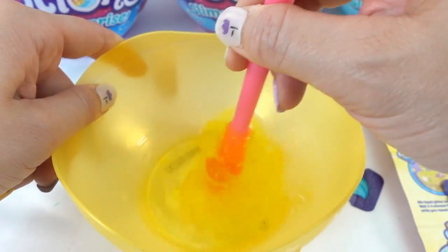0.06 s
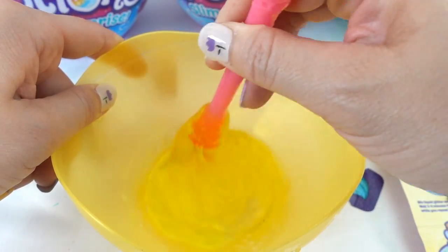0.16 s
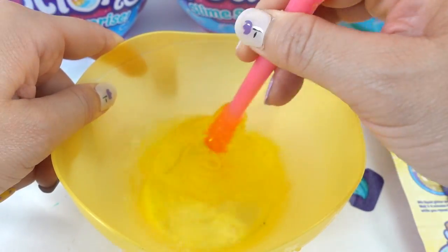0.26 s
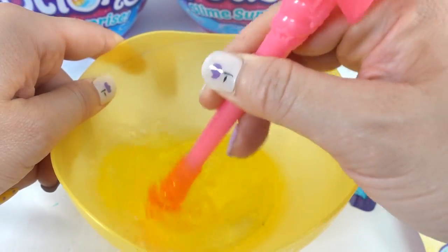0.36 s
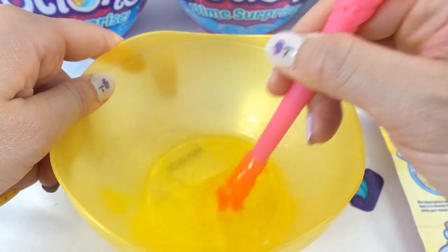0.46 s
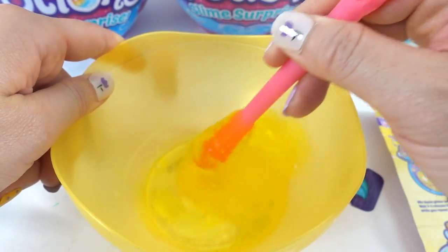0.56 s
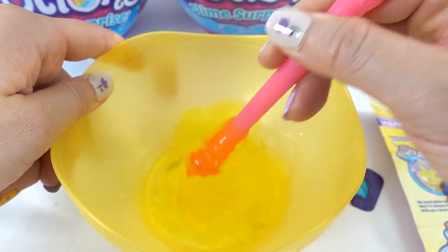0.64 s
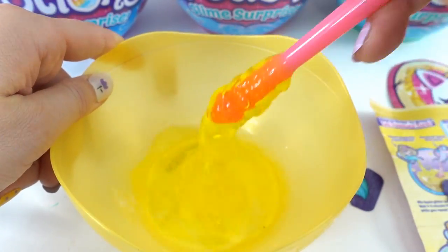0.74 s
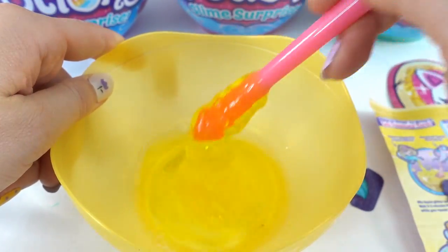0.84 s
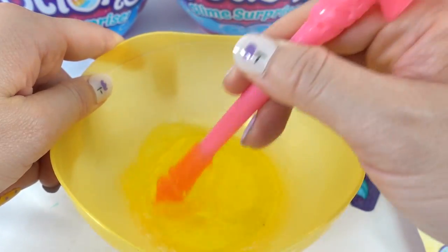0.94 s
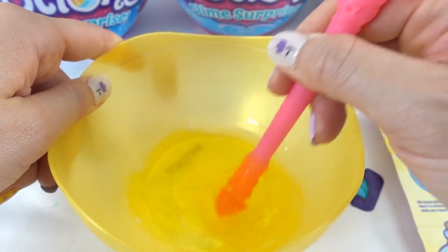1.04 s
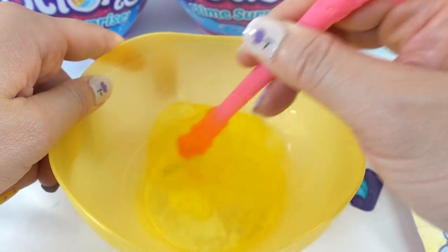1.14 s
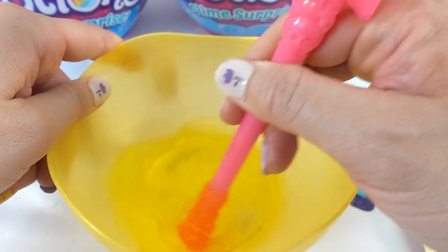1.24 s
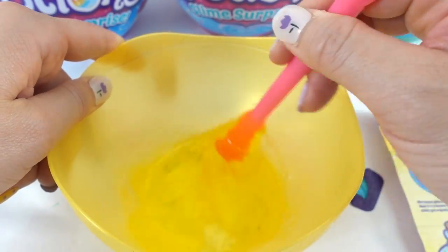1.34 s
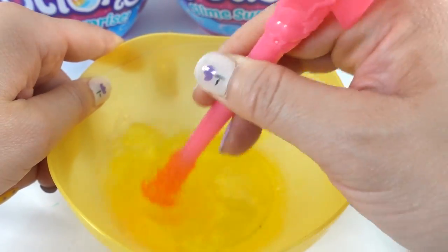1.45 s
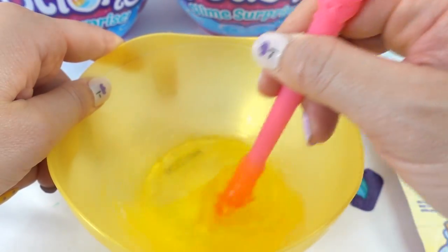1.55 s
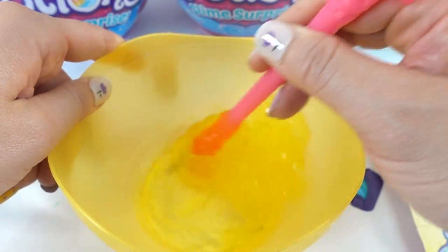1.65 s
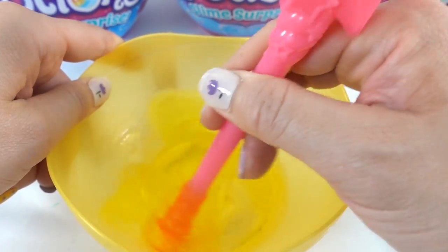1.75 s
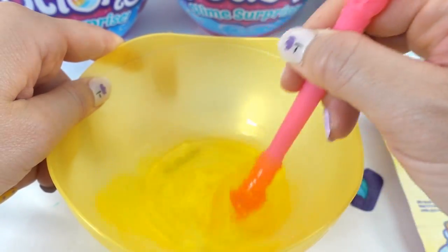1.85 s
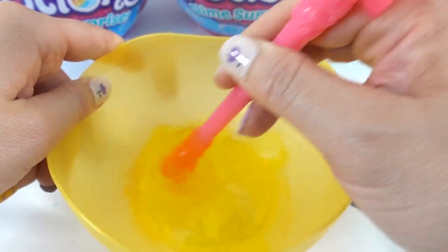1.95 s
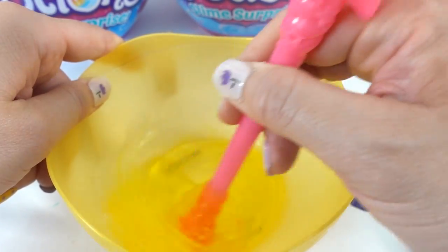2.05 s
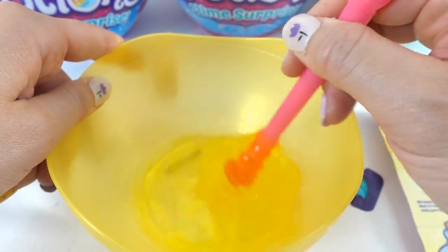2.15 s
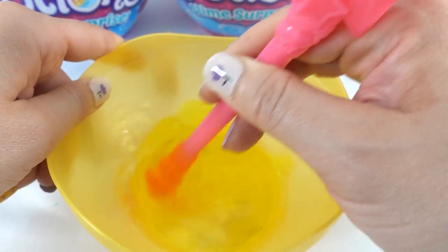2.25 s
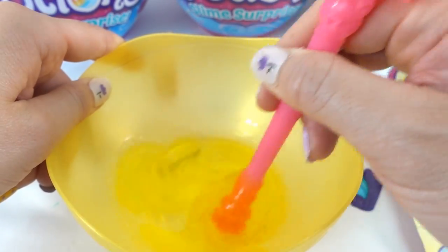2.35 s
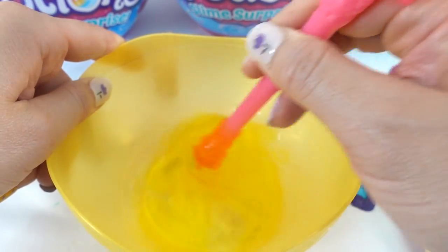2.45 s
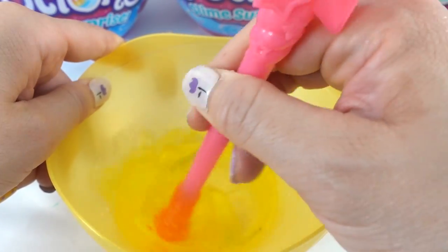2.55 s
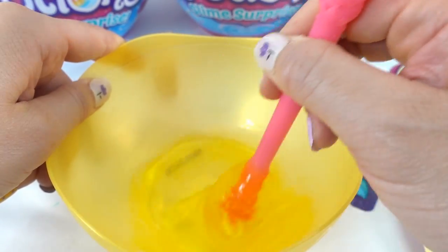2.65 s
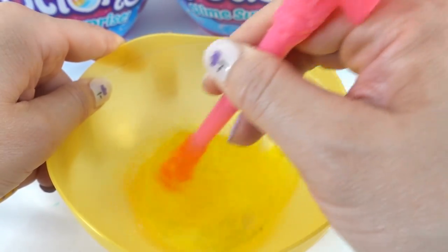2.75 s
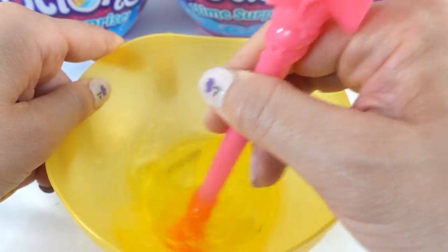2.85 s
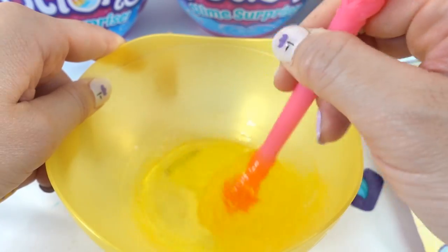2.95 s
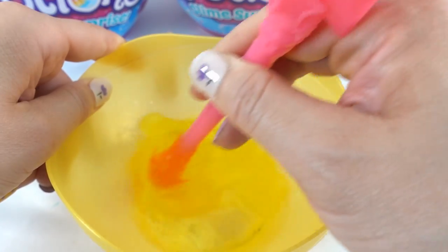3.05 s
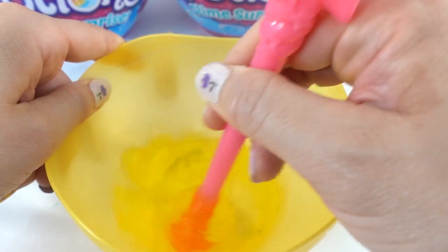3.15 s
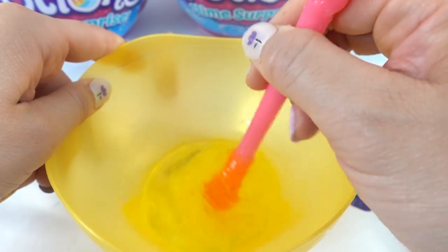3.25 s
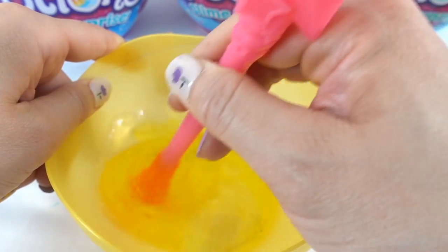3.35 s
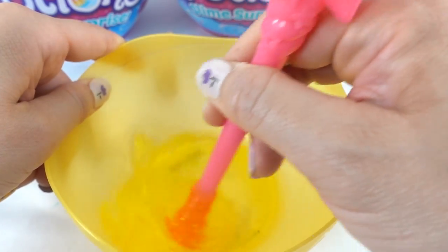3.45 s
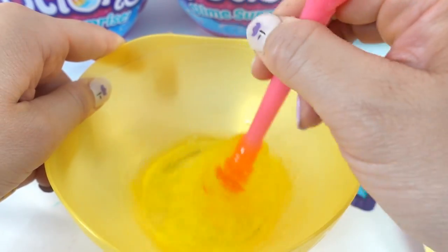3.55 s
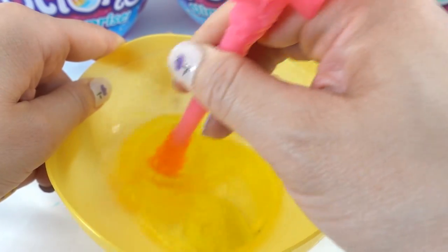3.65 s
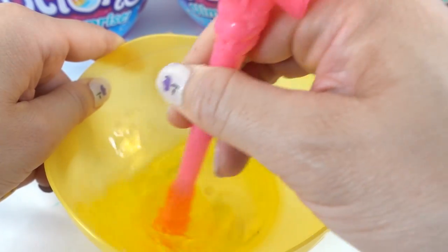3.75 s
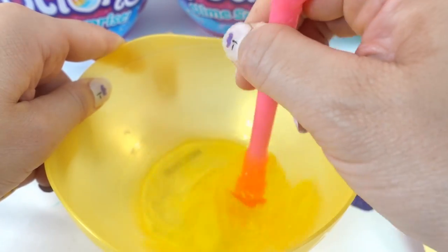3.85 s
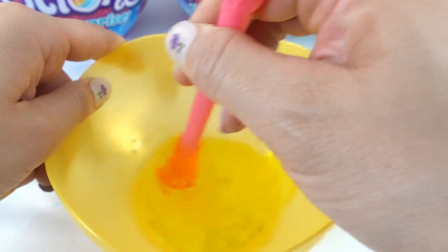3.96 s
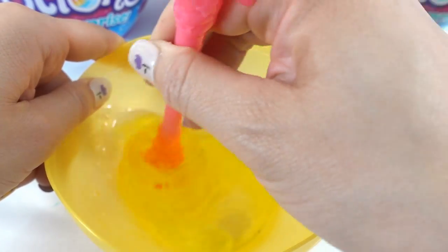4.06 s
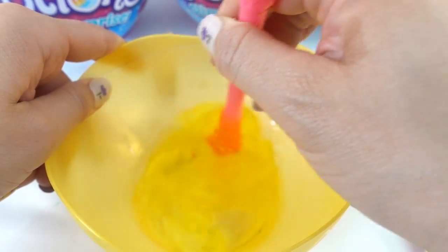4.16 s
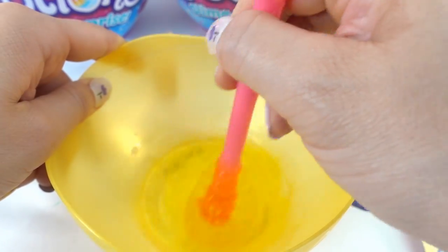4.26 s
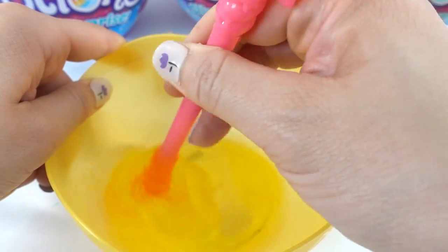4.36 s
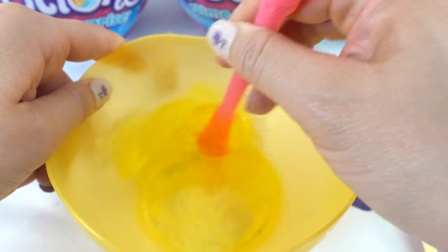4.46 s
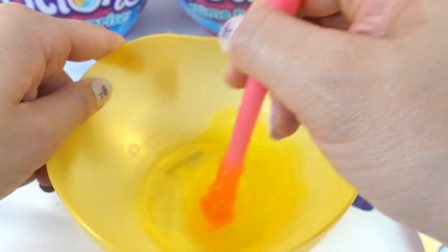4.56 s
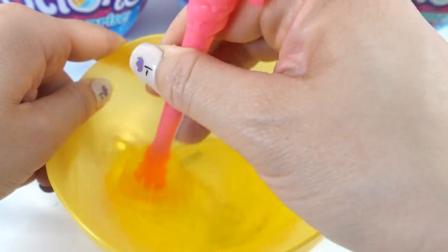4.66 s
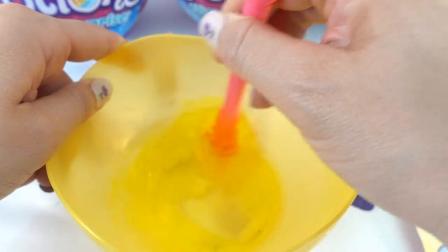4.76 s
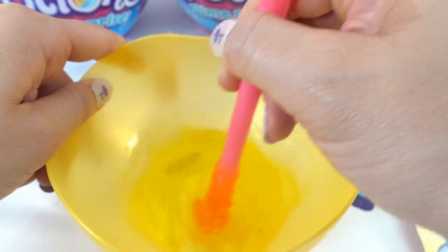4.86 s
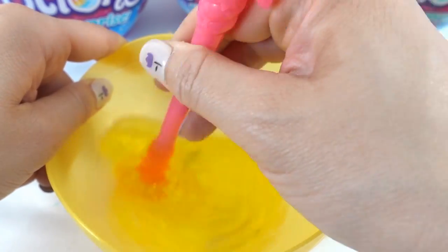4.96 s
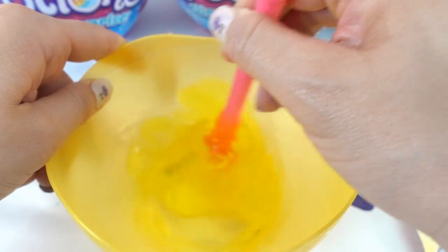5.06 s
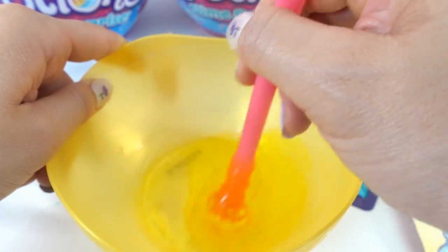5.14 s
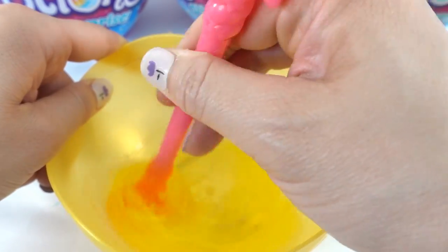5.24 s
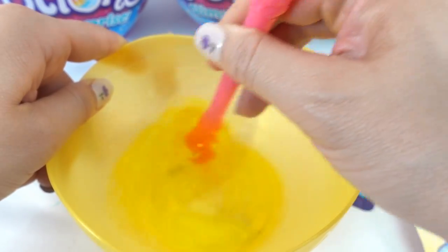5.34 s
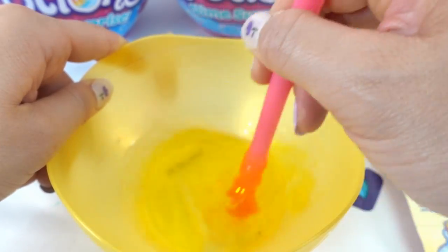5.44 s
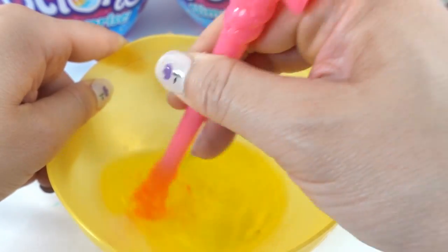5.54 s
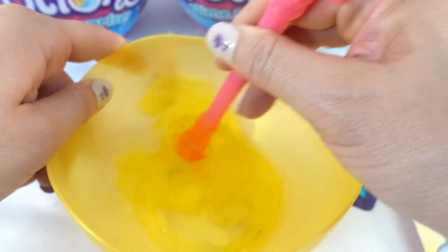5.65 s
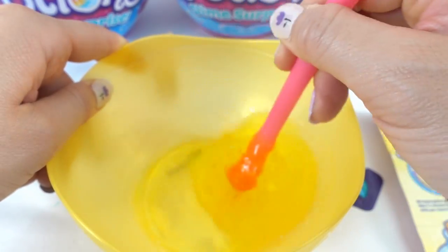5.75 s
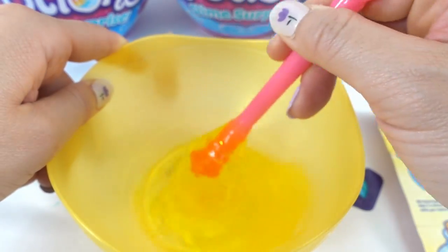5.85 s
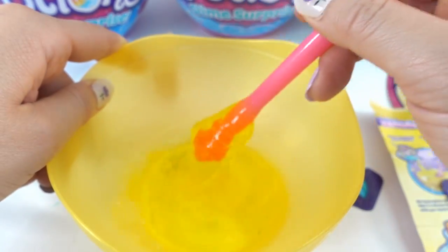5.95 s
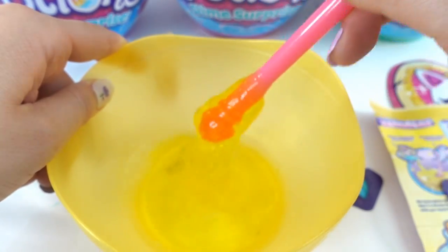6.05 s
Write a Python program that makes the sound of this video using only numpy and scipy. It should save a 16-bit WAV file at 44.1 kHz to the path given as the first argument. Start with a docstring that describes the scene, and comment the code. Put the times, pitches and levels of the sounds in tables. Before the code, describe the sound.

Up close in a quiet room, a plastic stick rubs softly through slime in a plastic bowl and pauses for half a second. It then settles into steady stirring, about three or four sticky scrapes a second. Two bubbles snap sharply early on, and the stick bumps the bowl now and then, hardest around the middle. The stirring ends with a couple of tiny clicks over faint hiss.

```python
"""A plastic wand stirs thick slime in a hand-held plastic bowl, close to a stereo microphone in a quiet room.
The tip scrapes the wall in a few soft strokes, then rests for half a second while the slime pops.
From 1 s on it stirs stroke after stroke, squelching, slipping in short bursts and knocking the bowl.
Two sharp bubbles snap near 1.5 s and the hardest knock lands at 3.3 s.
The stirring stops just before 6 s, leaving two small ticks over the room tone."""
import sys
import numpy as np
from scipy import signal
from scipy.fft import rfft, irfft
from scipy.io import wavfile
from scipy.ndimage import uniform_filter1d

SR = 44100
rng = np.random.default_rng(int(sys.argv[2]) if len(sys.argv) > 2 else 0)


def transcribe(signal):
    """Save signal, clipped to [-1, 1], as a 16-bit WAV file at the path in sys.argv[1]."""
    frames = np.atleast_2d(signal).T
    limited = np.clip(frames, -1, 1)
    pcm = np.round(limited * 32767).astype(np.int16)
    wavfile.write(sys.argv[1], SR, pcm)


N = 269098

# stereo width of the bowl, centred in the bass and wide on top: pitch_hz, side_db
BOWL_WIDTH = [(100, -57), (500, -21.5), (1500, -12), (4000, -10), (9000, -1), (14000, -2)]


def scrape():
    """The touching tip drives the floor, wall and treble resonances of the bowl and squeezes the slime."""
    # resonances of bowl and wand, damped by slime: pitch_hz, base_width_hz, level_db
    floor_modes = [(117, 50, -21), (278, 46, -11.5), (577, 257, -12.5), (903, 153, -7.5), (1044, 72, 0),
                   (1266, 274, -6)]
    wall_modes = [(1580, 79, 4), (1856, 95, 3), (2071, 116, 0.5), (2390, 260, -2), (2834, 364, -6.5),
                  (3256, 147, -1), (3696, 410, -3), (3895, 310, -6.5), (4230, 215, -4.5), (4637, 59, 1.5),
                  (5095, 500, -4.5)]
    treble_modes = [(5950, 260, 18.5), (6740, 130, 5.5), (7070, 790, 14.5), (7960, 850, 9.5),
                    (9040, 3900, 0), (11400, 1500, 2), (13700, 1200, -1), (16400, 4600, -3)]
    touching, level_db, floor_db, treble_db, pitch_hz = strokes()
    # the tip lands and lets go within a few ms; the slime clings longer
    land, grip, cling, wake = np.exp(-1 / (np.array([.003, .0025, .03, .004]) * SR))
    edges = [signal.lfilter([1 - r], [1, -r], touching, zi=[r])[0] for r in (land, grip)]
    contact = np.maximum(*edges) + 0.43 * signal.lfilter([1 - cling], [1, -cling], touching)
    rub = friction(per_s=4500, spread_db=2) * from_db(0.62 * drift(23) + 0.55 * drift(84))
    floor = from_db(floor_db) * rubbed_bowl(rub, floor_modes, low_cut_hz=31, wander_db=5, wander_hz=12.5)
    wall = rubbed_bowl(rub, wall_modes, low_cut_hz=820, wander_db=5.5, wander_hz=12.8,
                       focus_hz=pitch_hz, focus_db_per_octave=12)
    # the treble builds up as the tip gathers speed
    speed = signal.lfilter([1 - wake], [1, -wake], np.minimum(contact, 1) * from_db(treble_db))
    treble = speed * rubbed_bowl(rub, treble_modes, low_cut_hz=6900, wander_db=5, wander_hz=10.8)
    return contact * from_db(level_db) * (floor + wall + treble + from_db(-11.5) * squelches())


def strokes():
    """Control curves for the scrape: each stroke is one arc up the wall and back."""
    # strokes of the tip: start_s, end_s, start_db, end_db, floor_db, treble_db, pitch_hz, fastest_fraction
    stroke_table = [(0.0, 0.1, -48.5, -47, 1.5, -16, 2360, 1),
                    (0.113, 0.169, -42.5, -45, 6, -20, 2200, 0.6),
                    (0.186, 0.235, -43, -50.5, 3, -32, 2220, 0),
                    (0.293, 0.314, -50.5, -54.5, 3, -26, 2130, 0.7),
                    (0.333, 0.529, -54, -42.5, 1, -16.5, 2460, 0.94),
                    (1.072, 1.108, -37, -50, -4, -21, 2640, 0.1),
                    (1.219, 1.237, -48, -47.5, 2.5, -14, 2600, 0.5),
                    (1.24, 1.365, -45.5, -41, -0.5, -15.5, 2520, 0.93),
                    (1.447, 1.64, -39, -40, -6, -13.5, 2800, 0.57),
                    (1.691, 1.85, -37.5, -42, -3.5, -16, 2840, 0.5),
                    (1.844, 1.945, -38.5, -38.5, -9.5, -10, 3240, 0.1),
                    (1.948, 2.208, -46, -37.5, -2, -15.5, 2780, 0.9),
                    (2.228, 2.482, -42, -39, -3.5, -16.5, 2840, 0.6),
                    (2.527, 2.757, -43, -38.5, -4, -17.5, 2500, 1),
                    (2.775, 2.81, -50, -64, 1, -30, 1690, 0.6),
                    (2.853, 3.049, -43.5, -38.5, -4, -17, 2640, 1),
                    (3.091, 3.356, -39.5, -43, -2, -16.5, 2600, 0.07),
                    (3.329, 3.402, -31, -51.5, 3, -42, 1660, 0.4),
                    (3.413, 3.617, -45.5, -39, -1.5, -18.5, 2520, 1),
                    (3.67, 3.914, -44, -38.5, -0.5, -17.5, 2560, 1),
                    (3.907, 3.973, -48.5, -39, -4, -25, 2400, 0.9),
                    (3.986, 4.075, -37, -69, 9, -41, 1540, 0.5),
                    (4.134, 4.282, -49.5, -43.5, 1.5, -21, 2180, 0.8),
                    (4.339, 4.42, -34.5, -39, -2, -18, 2620, 0.1),
                    (4.425, 4.564, -42, -40.5, 0, -18, 2410, 0.6),
                    (4.628, 4.867, -35, -43, -2, -15, 2670, 0.48),
                    (4.892, 5.08, -37.5, -35, -5, -14.5, 2730, 1),
                    (5.07, 5.146, -42.5, -38.5, -2, -14.5, 3220, 0),
                    (5.183, 5.441, -38, -40.5, -2, -14, 2720, 0.9),
                    (5.492, 5.509, -46, -42, 7, -11, 2860, .5),
                    (5.512, 5.653, -36, -41.5, -0.5, -14.5, 2800, 0.5),
                    (5.655, 5.765, -41.5, -43, -4.5, -15.5, 2500, 0)]
    t, rows = np.arange(N) / SR, np.array(stroke_table)
    current = np.maximum(np.searchsorted(rows[:, 0], t, "right") - 1, 0)
    start_s, end_s, start_db, end_db, floor_db, treble_db, pitch_hz, fastest = rows[current].T
    progress = np.clip((t - start_s) / (end_s - start_s), 0, 1)
    fastest = np.clip(fastest, .05, .95)
    arc = np.sin(np.pi / 2 * np.minimum(progress / fastest, (1 - progress) / (1 - fastest)))
    touching = (t <= end_s) * 1.
    level_db = start_db + (end_db - start_db) * progress
    # at its fastest the tip is highest on the wall: a touch softer, less floor, brighter, higher
    return touching, level_db - arc, floor_db - 3 * arc, treble_db + 4 * arc, pitch_hz * (1 + 0.068 * arc)


def friction(per_s, spread_db):
    """Stick-slip of the tip on the rough wall: dense uneven clicks, a mid and a side stream."""
    sizes = from_db(spread_db * np.minimum(rng.exponential(1, (2, N)), 5)) * rng.choice([-1, 1], (2, N))
    return rms_one(sizes * (rng.random((2, N)) < per_s / SR) + 1e-9)


def rubbed_bowl(rub, modes, low_cut_hz, wander_db, wander_hz, focus_hz=1, focus_db_per_octave=0):
    """Friction through resonances; the moving tip wakes now one, now another. Level evened to 1."""
    out, signs = 0, rng.choice([-1., 1.], N)     # every click pushes each mode its own way
    for k, (hz, base_width_hz, level_db) in enumerate(modes):
        octaves_away = np.abs(np.log2(hz / focus_hz))
        drive = from_db(level_db + wander_db * drift(wander_hz) - focus_db_per_octave * octaves_away)
        band = (hz, 1.6 * base_width_hz)
        mid, side = resonate(rub * np.roll(signs, k) * drive, band, band)     # twice, for dark valleys
        out = out + stereo(mid, side, at_hz(BOWL_WIDTH, hz))
    out = high_pass(out, low_cut_hz)
    return out / np.sqrt(uniform_filter1d(out.mean(axis=0) ** 2, size=2000, mode="reflect") + 1e-12)


def slips():
    """The tip slips and catches again: a fast rough rub that swells and stops around one pitch."""
    # slips of the tip: peak_s, level_db, pitch_hz, swell_s, fall_s, treble_db
    slip_table = [(0.085, -37, 2440, 0.0082, 0.0044, -17), (0.392, -34, 3440, 0.014, 0.0053, -20),
                  (0.414, -37, 1980, 0.0047, 0.0038, -30), (0.506, -33, 2440, 0.02, 0.0088, -24),
                  (1.254, -38.5, 2490, 0.0077, 0.012, -7), (1.345, -34, 2420, 0.022, 0.011, -11),
                  (1.493, -35.5, 3500, 0.0039, 0.0064, -6.5), (1.599, -37, 2600, 0.011, 0.014, -12),
                  (1.629, -41, 2290, 0.0037, 0.002, -1), (1.762, -37, 1560, 0.0088, 0.025, -6),
                  (1.932, -23.5, 3640, 0.0069, 0.0076, -13), (2.033, -29.5, 3300, 0.0054, 0.016, -40),
                  (2.09, -31, 1500, 0.0016, 0.0028, -30), (2.132, -37, 2350, 0.0037, 0.007, -10),
                  (2.249, -36, 1120, 0.0027, 0.031, -32), (2.309, -37, 2120, 0.0069, 0.012, -5.5),
                  (2.332, -32.5, 1375, 0.0059, 0.011, -16), (2.476, -29, 2300, 0.013, 0.0019, -15),
                  (2.536, -37, 1090, 0.0022, 0.016, -39), (2.569, -35, 3180, 0.0026, 0.03, -14.5),
                  (2.751, -33.5, 3440, 0.0039, 0.0026, -6.5), (2.837, -49, 3400, 0.0032, 0.0045, -28),
                  (3.037, -26.5, 4360, 0.0045, 0.0056, -14.5), (3.414, -35.5, 3250, 0.0043, 0.01, -37),
                  (3.471, -38, 867, 0.009, 0.0038, -78), (3.622, -33, 2460, 0.0095, 0.0041, -35),
                  (4.172, -36.5, 1065, 0.0042, 0.021, -58), (4.212, -37, 1100, 0.013, 0.0065, -39),
                  (4.261, -38.5, 1910, 0.0021, 0.02, -11), (4.434, -30, 3140, 0.0035, .008, -12),
                  (4.441, -23.5, 3250, 0.0063, 0.0081, -45), (4.543, -33, 2090, 0.006, 0.0052, -13),
                  (4.701, -28.5, 3370, 0.0091, 0.013, -12.5), (4.861, -36.5, 1120, 0.029, 0.004, -11),
                  (4.911, -35, 1030, 0.012, 0.024, -28), (5.306, -31, 3410, 0.031, 0.038, -11),
                  (5.336, -26, 3200, 0.008, 0.0022, -27), (5.607, -27.5, 3100, 0.0028, 0.0057, -23),
                  (5.671, -31.5, 3890, 0.0016, 0.02, -12.5)]
    out, t = np.zeros((2, N)), np.arange(-1800, 1800) / SR
    soften = signal.butter(2, 5200, fs=SR, output="sos")
    for peak_s, level_db, pitch_hz, swell_s, fall_s, treble_db in slip_table:
        envelope = np.exp(-(t / np.where(t < 0, swell_s, fall_s)) ** 2)
        white = rng.standard_normal((2, len(t)))
        squeak = rms_one(resonate(white, (pitch_hz, 113)) + 0.23 * resonate(white, (2850, 1000)))
        fizz = rms_one(resonate(high_pass(white, 7100), (3500, 2500), (7100, 5600)))
        rub = signal.sosfilt(soften, squeak) + from_db(treble_db) * fizz
        add(out, peak_s + t[0], from_db(level_db) * stereo(*(envelope * rub), side_db=-8))
    return out


def knocks():
    """A light touch, then the blow with its crack; the place struck sets the balance of the bowl's modes."""
    # wand against the wall: blow_s, lead_s, deep_db, bass_db, low_mid_db, mid_db, upper_db
    knock_table = [(0.134, 0.0048, -47, -34.5, -33.5, -31, -34.5),
                   (1.264, 0.0071, -46, -37.5, -24.5, -22, -37),
                   (1.45, 0.0047, -40, -37.5, -34.5, -41, -48), (1.687, 0.0046, -44, -38, -36.5, -31, -36),
                   (2.4389, 0.0049, -43, -31.5, -20, -22.5, -24),
                   (2.725, 0.005, -43, -32, -19.5, -17.5, -28), (3.3286, 0.005, -32, -16.5, -13, -9, -16.5),
                   (3.9796, 0.00089, -36.5, -22, -18.5, -18, -18),
                   (4.262, 0.000876, -62, -43, -39, -22, -32), (4.416, 0.0047, -67, -37.5, -40, -24, -32),
                   (4.731, 0.014, -63, -36, -62, -45, -54), (5.514, 0.0031, -35.5, -27.5, -19, -9.5, -32)]
    # modes of the struck bowl: pitch_hz, level_db, t60_s
    bowl_modes = [(56, -6, 0.06), (83, -5, 0.057), (110, 8.5, 0.099), (159.6, -1.5, 0.15),
                  (197, -11, 0.089), (269.8, 3.5, 0.11), (326, 6.5, 0.044), (386, -7.5, 0.12),
                  (518, 7.5, 0.025), (620, -9, 0.11), (869, -7, 0.048), (1008, 1.5, 0.03),
                  (1273, -9.5, 0.066), (1240, 9, 0.036), (1545, 4.5, 0.027), (2010, -0.5, 0.013),
                  (2160, -5.5, 0.058), (2360, -6.5, 0.057), (2830, 6, 0.0059), (3310, -11, 0.03),
                  (3960, -2, 0.019), (5090, -6, 0.026)]
    crossovers_hz = [230, 430, 720, 1150]
    out, t = np.zeros((2, N)), np.arange(9000) / SR
    for blow_s, lead_s, *bands_db in knock_table:
        lead_s = np.clip(lead_s, 0, .01)     # the touch comes at most 10 ms early
        scatter, sound = rng.normal(0, 1, (len(bowl_modes), 2)), 0
        for k, ((hz, mode_db, t60_s), (jitter, pan)) in enumerate(zip(bowl_modes, scatter)):
            rise_s = 0.0026 * (300 / hz) ** 1.31     # the wall yields: low modes take longer to build up
            push = 0
            for hit_s, force in ((0, .3), (lead_s, 1)):
                age = np.maximum(t - hit_s, 0)
                push = push + force * age * np.exp(-age / rise_s) * np.sin(2 * np.pi * hz * age)
            gain = from_db(mode_db + bands_db[np.searchsorted(crossovers_hz, hz)] + 0.5 * jitter)
            tone = gain * ring(push / (rise_s ** 2 * SR), hz, t60_s) * (-1) ** k
            sound = sound + stereo(tone, pan * tone, at_hz(BOWL_WIDTH, hz))
        crack = rng.standard_normal((2, len(t))) * np.exp(-np.abs(t - lead_s) / .0006) * (t >= lead_s)
        sound += from_db(bands_db[-1] + 7.5) * stereo(*resonate(crack, (3150, 2900), (3100, 3700)), -1.2)
        # the many small modes of wall and slime blur into a wash
        wash = rng.standard_normal((2, len(t))) * from_db(-60 * t / 0.066) * (t >= lead_s)
        sound += from_db(bands_db[3] - 7) * stereo(*resonate(wash, (2100, 2500), (1500, 3300)), -15)
        add(out, blow_s - lead_s, sound)
    return out


def pops():
    """A tiny snap: a few cycles at the bubble's pitch, a weak broad tick and some body from the bowl."""
    # slime bubbles and threads snapping: start_s, level_db, pitch_hz, body_db
    pop_table = [(0.197, -33, 3500, -11), (0.329, -36, 10900, -10), (0.5721, -34, 5560, -5),
                 (0.6899, -26, 8700, -6), (0.691, -30, 3700, 9.5), (1.129, -45, 4000, 13),
                 (1.2326, -23, 6600, -16), (1.397, -10.5, 3840, -4.5), (1.406, -24, 15100, -12),
                 (1.411, -17, 5900, -28), (1.414, -23, 12000, -1), (1.6364, -25, 12000, -15),
                 (1.657, -30, 11000, -1), (1.664, -7.5, 3800, -8), (1.787, -33, 10000, 4),
                 (2.2514, -21, 4860, -20), (3.644, -30.5, 12700, 11.5), (3.6628, -23.5, 7060, -3),
                 (4.938, -24, 13500, -20), (4.968, -20, 9500, -20), (5.9237, -35, 5750, 3),
                 (5.96, -27, 7650, -7)]
    out, t = np.zeros((2, N)), np.arange(900) / SR
    for start_s, level_db, pitch_hz, body_db in pop_table:
        burst = rng.standard_normal((2, len(t))) * np.exp(-t / 0.0017) * from_db(-6)
        bubble = (pitch_hz, .45 * pitch_hz)
        snap = resonate(burst, bubble, bubble) + .1 * resonate(burst, (8000, 12000))
        body = from_db(body_db) * resonate(burst, (2000, 1500))
        add(out, start_s, from_db(level_db) * stereo(*(snap + body), side_db=-4))
    return out


def squelches(count=420):
    """Air pockets in the slime open and close: short rough tones that slide, mostly upward."""
    out, t = np.zeros((2, N)), np.arange(2000) / SR
    for when, pitch, slide, softness, span, pan in rng.random((count, 6)):
        progress = t / (.003 + .014 * span)
        hz = 1000 * 4 ** pitch * (1 + (.25 * slide - .08) * np.minimum(progress, 2))
        roughness = 1 + 0.29 * uniform_filter1d(rng.standard_normal(len(t)), size=40) * np.sqrt(40)
        envelope = progress * np.exp(1 - progress ** 2)
        tone = roughness * envelope * np.sin(2 * np.pi * np.cumsum(hz) / SR)
        add(out, when * N / SR, from_db(-12 * softness) * stereo(tone, (2 * pan - 1) * tone, -1.5))
    return rms_one(out)


def room(x, t60_s=0.33, wall_cut_hz=27000):
    """Short reverb: all-pass smear into sixteen echo loops, a little duller each round, bass centred."""
    for lag in (71, 113, 197):
        gap = np.zeros(lag - 1)
        x = signal.lfilter(np.r_[-.6, gap, 1], np.r_[1, gap, -.6], x)
    out, dull = np.zeros((2, N)), np.exp(-2 * np.pi * wall_cut_hz / SR)
    for k, lag in enumerate((rng.uniform(0.029, 0.073, 16) * SR).astype(int)):
        loop, gain, state = x.copy(), from_db(-60 * lag / SR / t60_s), [0.]
        for i in range(lag, N, lag):
            echo, state = signal.lfilter([gain * (1 - dull)], [1, -dull], loop[i - lag:i], zi=state)
            loop[i:i + lag] += echo[:N - i]
        out[k % 2] += (loop - x) * (-1) ** (k // 2)
    return stereo(out[0], high_pass(out[1], 1130), side_db=-2.9)


def room_tone():
    """A steady bed of room air and microphone hiss."""
    # colour of the bed: pitch_hz, level_db
    colour = [(15, -36), (25, -1), (86, -3.5), (102, 0), (161, 0), (228, 1.5), (342, -3), (654, -4.5),
              (749, -5), (1820, -14), (2090, -13.5), (11700, -21.5), (15800, -11.5)]
    # stereo width of the bed: pitch_hz, side_db
    width = [(25, -29), (150, -9.5), (1000, 0.5), (5000, 0), (14000, 2)]
    hz = np.maximum(np.fft.rfftfreq(N, 1 / SR), 1)
    mid, side = rfft(rng.standard_normal((2, N))) * from_db(at_hz(colour, hz))
    return rms_one(irfft(stereo(mid, side, at_hz(width, hz)), N))


def from_db(db):
    return 10 ** (np.asarray(db) / 20)


def rms_one(x):
    return x / np.sqrt(np.mean(x ** 2) + 1e-20)


def at_hz(curve, hz):
    """Reads a curve along a log frequency axis."""
    points_hz, values = np.array(curve).T
    return np.interp(np.log(hz), np.log(points_hz), values)


def drift(rate_hz):
    """Slow noise of spread 1."""
    r = np.exp(-80 * np.pi * rate_hz / SR)
    slow = signal.lfilter([1], [1, -2 * r, r * r], rng.standard_normal(N // 40 + 2002))[2000:]
    return np.interp(np.arange(N) / 40, np.arange(len(slow)), rms_one(slow))


def ring(x, hz, t60_s):
    """A unit click sets a sine of height 1 ringing."""
    r, w = from_db(-60 / (t60_s * SR)), 2 * np.pi * hz / SR
    return signal.lfilter([0, np.sin(w)], [1, -2 * r * np.cos(w), r * r], x + 1e-18)


def resonate(x, *bands):
    """Band-passes in series, each (pitch_hz, width_hz) with a peak gain of 1."""
    for hz, width_hz in bands:
        r, w = np.exp(-np.pi * width_hz / SR), 2 * np.pi * hz / SR
        x = signal.lfilter(np.array([1, 0, -1]) * (1 - r * r) / 2, [1, -2 * r * np.cos(w), r * r], x)
    return x


def high_pass(x, hz):
    return signal.sosfilt(signal.butter(3, hz, "high", fs=SR, output="sos"), x)


def stereo(mid, side, side_db):
    """Left and right from a shared and an opposed part."""
    return mid + from_db(side_db) * side * np.array([[1], [-1]])


def add(out, start_s, sound):
    """Mixes a short sound in."""
    i = max(round(start_s * SR), 0)
    out[:, i:i + sound.shape[1]] += sound[:, :N - i]


def scene():
    """The bowl up close, with a little reverb and faint room tone behind it."""
    bowl = scrape() + slips() + knocks() + pops()
    return bowl + from_db(-18) * room(bowl.mean(axis=0)) + from_db(-54.5) * room_tone()


def record(dry):
    """A steep low-pass takes off the top above 16 kHz."""
    return signal.sosfilt(signal.ellip(12, .5, 70, 16000, fs=SR, output="sos"), dry)


dry = scene()
out = record(dry)
transcribe(out)
```